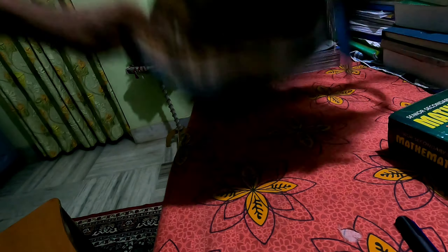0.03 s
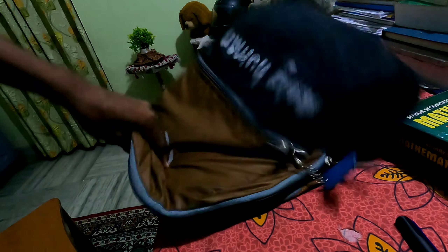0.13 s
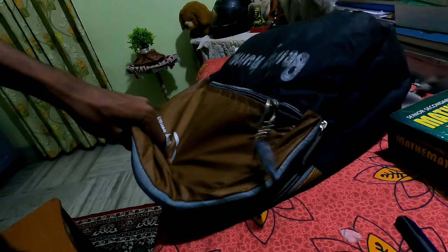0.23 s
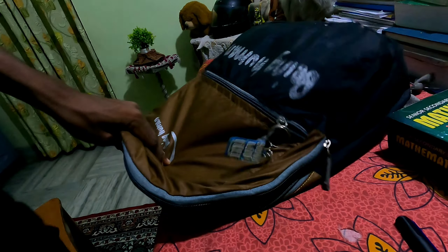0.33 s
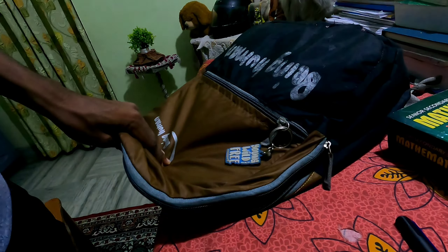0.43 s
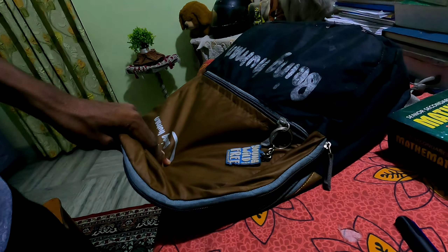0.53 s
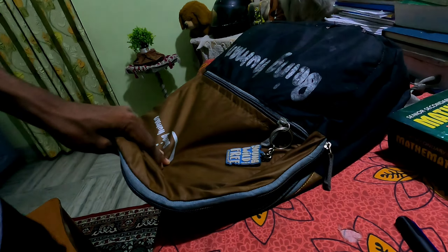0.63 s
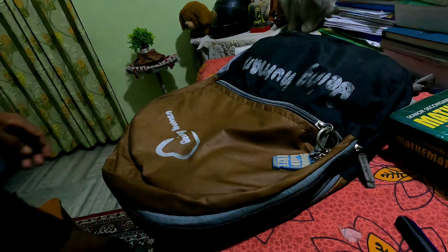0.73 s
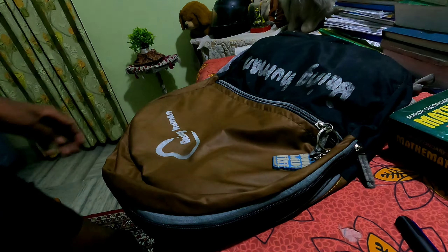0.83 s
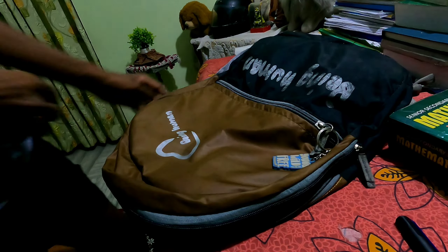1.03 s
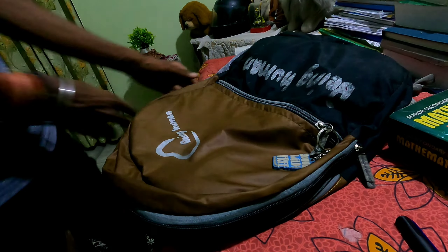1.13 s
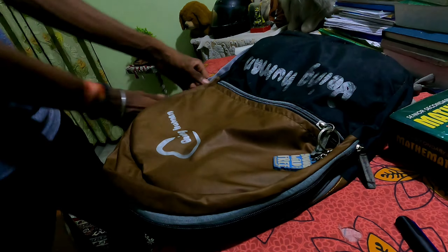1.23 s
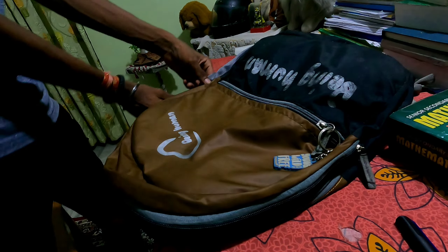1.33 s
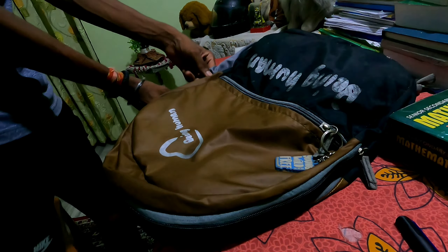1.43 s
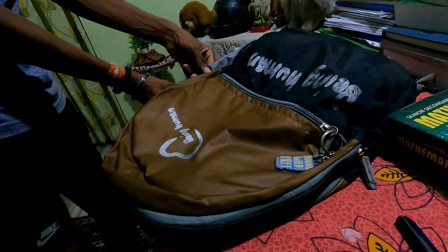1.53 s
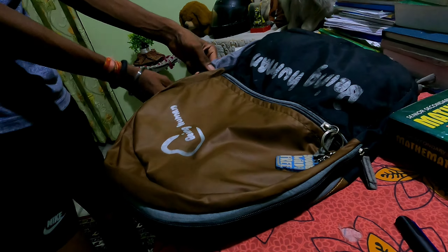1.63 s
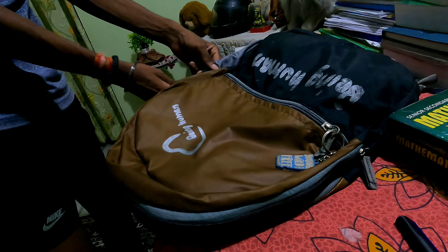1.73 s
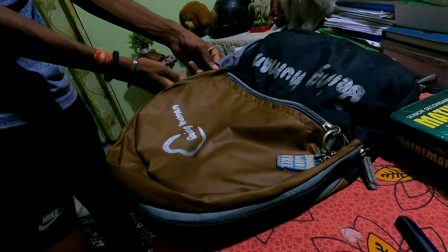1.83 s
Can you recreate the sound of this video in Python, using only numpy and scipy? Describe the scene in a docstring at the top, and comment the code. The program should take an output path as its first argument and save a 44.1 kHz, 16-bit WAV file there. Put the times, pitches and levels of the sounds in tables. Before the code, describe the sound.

A loaded backpack lands on a table with a cluster of padded thuds and cloth slaps, then two soft furniture bumps, a brief dropout, and quiet rummaging with tiny metal ticks, close in a small room.

```python
"""In a small room, a full backpack slaps down on a cloth-covered table; its gear tumbles and the table hums.
Decaying modes make the landing, enveloped grains and noise the fabric, slow sines the swaying table.
Two soft bumps travel through the furniture as dispersed knocks with thumps. The sound drops out for a moment,
then fades back in as hands rummage over the fabric, swishing, with a faint wavering tone.
Small ticks from zip pulls and buckles are bursts of resonant noise."""
import sys
import numpy as np
from scipy import signal
from scipy.fft import rfft, irfft
from scipy.io import wavfile

SR = 44100
rng = np.random.default_rng(int(sys.argv[2]) if len(sys.argv) > 2 else 0)


def to_wav(s):
    """Save 16-bit WAV."""
    ch = np.atleast_2d(s).T  # columns
    pcm = np.round(np.clip(ch, -1, 1) * 32767)  # PCM
    wavfile.write(sys.argv[1], SR, pcm.astype(np.int16))


N = 81585
TIME = np.arange(N) / SR
FREQUENCY = np.maximum(np.arange(N // 2 + 1) * SR / N, 1)   # Hz, kept above zero for the logarithm
ROOM_T60_S, CLOTH_ROOM_DB, LANDING_ROOM_DB = 0.24, -15.5, -9.5


def from_db(db):
    """Level: 20 dB is a factor of ten in amplitude."""
    return 10 ** (np.asarray(db) / 20)


def rms_one(x):
    """Normalisation: scale to unit mean power."""
    return x / np.sqrt(np.mean(x ** 2) + 1e-20)


def noise():
    """White noise: equal mean power at all frequencies."""
    return rng.standard_normal(N)


def level(rows):
    """Envelope: gain over time, interpolated in decibels."""
    return from_db(np.interp(TIME, *np.transpose(rows)))


def colour(x, points):
    """Spectral shaping: gain interpolated over log frequency, 12 dB/octave loss below; rms 1."""
    hz, db = np.transpose(points)
    gain = from_db(np.interp(np.log(FREQUENCY), np.log(hz), db))
    gain = gain * np.minimum(FREQUENCY / hz[0], 1) ** 2
    return rms_one(irfft(rfft(x) * gain, N))


def lowpass(x, hz, order=2):
    """Low-pass filtering with a Butterworth response."""
    sos = signal.butter(order, min(hz, SR / 2 - 1), fs=SR, output="sos")
    return signal.sosfilt(sos, x + 1e-18)


def drift(rate_hz):
    """Random modulation: low-passed noise with spread 1."""
    settled = lowpass(rng.standard_normal(2 * N), rate_hz)[N:]
    return rms_one(settled)


def click(s):
    """Impulse: one unit click, shared between neighbouring samples."""
    return np.maximum(1 - np.abs(TIME - s) * SR, 0)


def ring(x, hz, t60):
    """Damped resonance: a unit click sets a sine of height 1 ringing."""
    radius = from_db(-60 / (t60 * SR))
    angle = 2 * np.pi * hz / SR
    return signal.lfilter([0, np.sin(angle)], [1, -2 * radius * np.cos(angle), radius ** 2], x + 1e-18)


def swell(s, attack, t60):
    """Growth and decay: exponential rise to a peak at s, then exponential fall."""
    rise = (TIME - s) / attack
    fall = (s - TIME) * np.log(1000) / t60
    return np.exp(np.minimum(rise, fall))


def grains(per_s, spread_db):
    """Stick-slip friction: tiny random slips of fibres, of uneven size and either sign."""
    sizes = from_db(spread_db * np.minimum(rng.exponential(1, N), 5))
    return (rng.random(N) < per_s / SR) * sizes * rng.choice([-1, 1], N)


def room(x, wet_db):
    """Reverberation: add a diffuse decaying tail that starts with the first wall echo."""
    tail = lowpass(noise(), 9500) * np.exp(-TIME * np.log(1000) / ROOM_T60_S)
    tail = tail * (TIME > 0.006)
    tail = tail / np.sqrt(np.sum(tail ** 2))
    return x + from_db(wet_db) * signal.fftconvolve(x, tail)[:N]


# spectrum of the room's hush: [f/Hz, relative density level/dB]
HUSH_COLOUR = [(30, -9.5), (100, 2.5), (250, -7.5), (400, -9), (620, -20), (1100, -17), (2000, -24.5),
               (4000, -39.5), (7000, -36.5), (7900, -49.5), (11000, -57), (15000, -73)]


def hush():
    """Background noise: a steady random sound with a falling spectrum."""
    return from_db(-52.5) * colour(noise(), HUSH_COLOUR)


# rubbing of fabric under the hands: [t/s, level/dB]
RUB_LEVEL = [(0, -53), (.14, -52.5), (.205, -57), (.3, -45.5), (.47, -56.5), (.53, -59), (.57, -68.5),
             (.96, -59), (1.08, -56), (1.15, -52.5), (1.19, -52.5), (1.26, -52.5), (1.4, -51),
             (1.45, -52.5), (1.57, -50.5), (1.63, -50.5), (1.68, -54.5), (1.85, -55.5)]
# its spectrum: [f/Hz, relative density level/dB]
RUB_SPECTRUM = [(150, -17), (400, -1), (520, 3), (700, 1), (1080, 2.5), (1550, -2.5), (3000, -7.5),
                (4500, -14.5), (7100, -14), (7800, -24.5), (10000, -29.5), (15000, -58)]
RUB_FLUTTER_DB = 1.5


def rubbing():
    """Friction noise: dense fibre slips, with a fluttering level, sum to a rustle."""
    rustle = colour(grains(per_s=7000, spread_db=1), RUB_SPECTRUM)
    flutter = from_db(RUB_FLUTTER_DB * drift(46))
    return room(level(RUB_LEVEL) * flutter * rustle, CLOTH_ROOM_DB)


# dull shifting of the bag's bulk: [t/s, level/dB]
SHIFT_LEVEL = [(0, -51), (.11, -47.5), (.19, -51), (.3, -24), (.5, -57), (.58, -54), (.8, -60.5),
               (.93, -44), (.99, -57.5), (1.1, -43.5), (1.25, -47.5), (1.4, -44.5), (1.55, -47.5),
               (1.85, -53)]
# its spectrum: [f/Hz, relative density level/dB]
SHIFT_SPECTRUM = [(30, -26), (70, -8.5), (115, 0.5), (180, 3), (240, -1), (315, 3.5), (430, -12),
                  (800, -29), (2000, -59.5)]


def shifting():
    """Random excitation: the moving load gives low-frequency noise."""
    return level(SHIFT_LEVEL) * colour(noise(), SHIFT_SPECTRUM)


# low sway of the table as it is leant on: [peak t/s, level/dB, attack/s, t60/s, mean f/Hz]
TABLE_SWAYS = [(0.081, -40.5, 0.04, 0.17, 52), (.24, -28, 0.013, 0.42, 41), (.45, -30, 0.043, 0.21, 44),
               (0.612, -43.5, 0.034, 0.48, 65), (0.879, -29.5, 0.036, 0.28, 22),
               (0.931, -37, 0.005, .12, 175), (1.245, -43, 0.021, 0.46, 60), (1.39, -42, 0.014, 0.16, 160),
               (1.437, -34, 0.02, 0.06, 89), (1.44, -42.5, 0.047, .1, 47)]
SWAY_SPREAD_HZ = 8.93


def sways():
    """Frequency modulation: pressure on the bag swells into low, unsteady vibrations of the table."""
    out = 0
    for s, db, attack, t60, hz in TABLE_SWAYS:
        pitch = hz + SWAY_SPREAD_HZ * drift(28)
        vibration = np.sqrt(2) * np.sin(2 * np.pi * np.cumsum(pitch) / SR)
        out = out + from_db(db) * swell(s, attack, t60) * vibration
    return out


# sleeves and palms brush over smooth nylon: [peak t/s, level/dB, attack/s, t60/s, centre f/Hz]
STROKES = [(.185, -51, 0.055, 0.37, 2800), (0.459, -60.5, 0.091, 0.49, 3500), (.97, -63, 0.11, 0.8, 5400),
           (1.183, -55.5, 0.015, 0.26, 2350), (1.305, -59, 0.0088, 0.13, 4000),
           (1.395, -54.5, 0.024, .22, 3600), (1.498, -55, .01, 0.21, 4200),
           (1.635, -57, 0.023, 0.098, 2170), (1.75, -62, .015, 0.15, 4920)]
# top end of every stroke's spectrum: [f/Hz, relative level/dB]
STROKE_TOP = [(7200, -1), (7900, -5.5), (10000, -13), (14000, -43)]
STROKE_SKIRT_DB = 9.5   # loss per octave off centre


def swishes():
    """Band-limited friction noise: each light stroke hisses around its own centre."""
    hiss = colour(noise(), [(100, 0.0042), *STROKE_TOP])
    out = 0
    for s, db, attack, t60, hz in STROKES:
        band = [(hz * 2.0 ** octave, -abs(octave) * STROKE_SKIRT_DB) for octave in range(-2, 3)]
        out = out + from_db(db) * swell(s, attack, t60) * colour(hiss, band)
    return out


# the bag and its load land: [t/s, level/dB, contact softness as cut-off f/Hz, thud f/Hz]
LANDING_BLOWS = [(.218, -13, 1200, 338), (0.2238, -11.5, 670, 275), (.232, -19.5, 870, 110),
                 (0.2404, -9, 417, 106.5), (0.2504, -14, 570, 115), (0.2661, -10, 1330, 378),
                 (0.285, -12.5, 1070, 89), (0.3005, -14.5, 730, 172), (0.335, -32, 810, 204),
                 (0.388, -26.5, 300, 65)]
# what the loaded table rings with: [f/Hz, level/dB, t60/s]
MODES = [(55.75, -17.5, 0.66), (80, -26.5, 0.57), (108.5, -12.5, 0.46), (161.6, -25.5, 0.53),
         (205.4, -18, 0.29), (245.3, -14, 0.17), (310.7, -16, 0.084), (385, -27, 0.083),
         (430, -16.5, 0.089), (543, -16.5, 0.12), (640, -12, 0.051), (811, -20, 0.15), (1072, -16.5, 0.13)]
THUD_T60_S, THUD_DB = 0.045, -1.5   # dead thud of the padding


def landing():
    """Modal excitation: padded blows thud and ring the table, each mode a little differently each time."""
    pushes = np.array([from_db(db) * lowpass(click(s), cut_hz) for s, db, cut_hz, _ in LANDING_BLOWS])
    strengths = from_db(rng.normal(0, 1.6, (len(LANDING_BLOWS), len(MODES))))
    ringing = 0
    for k, (hz, db, t60) in enumerate(MODES):
        sign = (-1) ** k   # neighbouring modes start in opposite directions
        ringing = ringing + sign * from_db(db) * ring(strengths[:, k] @ pushes, hz, t60)
    thuds = sum(ring(push, blow[3], THUD_T60_S) for push, blow in zip(pushes, LANDING_BLOWS))
    return room(ringing + from_db(THUD_DB) * thuds, LANDING_ROOM_DB)


# cloth slapping and crumpling: [peak t/s, level/dB, attack/s, t60/s]
CLOTH_SLAPS = [(0.2215, -32, .001, 0.074), (0.2358, -22, 0.0037, 0.035), (0.2393, -25, 0.0033, 0.047),
               (0.263, -29, 0.033, 0.42), (0.334, -38.5, 0.0086, 0.064), (0.375, -37, 0.0074, 0.088),
               (0.514, -53.5, 0.025, 0.068)]
# its spectrum: [f/Hz, relative density level/dB]
SLAP_SPECTRUM = [(150, 14), (500, 6.5), (1000, 7), (2000, -1), (4500, -7), (7000, -15), (10000, -30),
                 (15000, -51)]


def slaps():
    """Granular noise: bursts of dense fibre slips as the fabric slaps and crumples."""
    envelope = sum(from_db(db) * swell(s, attack, t60) for s, db, attack, t60 in CLOTH_SLAPS)
    crumple = colour(grains(per_s=16000, spread_db=2.2), SLAP_SPECTRUM)
    return room(envelope * crumple, CLOTH_ROOM_DB)


# the room's low modes boom on after the landing: [peak t/s, level/dB, attack/s, t60/s]
ROOM_BOOM = (.3, -29.5, 0.07, 0.62)
# their spectrum: [f/Hz, relative density level/dB]
BOOM_SPECTRUM = [(70, -14), (110, 1), (165, -2), (230, -8), (400, -29), (1000, -60)]


def boom():
    """Room resonance: low noise swells and decays after the landing."""
    s, db, attack, t60 = ROOM_BOOM
    return from_db(db) * swell(s, attack, t60) * colour(noise(), BOOM_SPECTRUM)


# zip pulls and buckles tick: [peak t/s, level/dB, resonance f/Hz, bandwidth/Hz, t60/s]
METAL_TICKS = [(.5135, -46, 3600, 1590, 0.067), (1.2895, -41.5, 3000, 1200, 0.011),
               (1.2986, -51, 3020, 696, .06), (1.4872, -33.5, 1710, 1170, 0.01),
               (1.739, -48.5, 2300, 700, 0.015), (1.753, -49, 2840, 250, 0.049)]


def ticks():
    """Resonant filtering: small metal parts touch in a short rattle with one broad resonance."""
    out = 0
    for s, db, hz, width_hz, t60 in METAL_TICKS:
        radius = np.exp(-np.pi * width_hz / SR)
        poles = [1, -2 * radius * np.cos(2 * np.pi * hz / SR), radius ** 2]
        rattle = signal.lfilter([1, 0, -1], poles, noise())
        rattle = rms_one(lowpass(rattle, 6000, order=3))
        out = out + from_db(db) * swell(s, 0.00014, t60) * rattle
    return room(out, CLOTH_ROOM_DB)


# bumps through the furniture:
# [t/s, level/dB, delay at 1 kHz/s, knock f/Hz, knock relative level/dB, thump f/Hz, thump t60/s]
FURNITURE_BUMPS = [(0.7217, -19, .0072, 990, -4, 41.4, 0.19),
                   (0.9136, -17.5, 0.00315, 486, -5, 51.4, 0.092)]
THUMP_LAG_S, THUMP_CUT_HZ = 0.0044, 165
KNOCK_CYCLES, KNOCK_TOP = 3.5, 3.3   # t60 in cycles; low-pass cut-off as a multiple of the knock's pitch


def bumps():
    """Dispersion: bending waves carry treble fastest, so a falling chirp comes first, then a thump."""
    out = 0
    for s, db, delay, knock_hz, knock_db, thump_hz, thump_t60 in FURNITURE_BUMPS:
        knock = ring(click(s), knock_hz, KNOCK_CYCLES / knock_hz)
        knock = lowpass(knock, KNOCK_TOP * knock_hz, order=3)
        knock = knock - lowpass(knock, knock_hz / 2, order=1)   # thin out the lows
        # this phase delays each frequency in proportion to 1 / sqrt(f)
        dispersion = np.exp(-4j * np.pi * delay * np.sqrt(1000 * FREQUENCY))
        knock = irfft(rfft(knock) * dispersion, N)
        push = lowpass(click(s + delay + THUMP_LAG_S), THUMP_CUT_HZ)
        thump = ring(push, thump_hz, thump_t60)
        out = out + from_db(db) * (from_db(knock_db) * knock - thump)
    return out


# a faint wavering tone while the hands move: [t/s, mean f/Hz, mean level/dB]
TONE_PATH = [(1.15, 546.6, -73), (1.195, 558, -51.5), (1.27, 585, -58), (1.33, 573.5, -60.5),
             (1.39, 555, -56), (1.45, 564, -75)]


def tone():
    """Frequency and amplitude modulation: a thin, unsteady note rises and sinks under the rustle."""
    s, hz, db = np.transpose(TONE_PATH)
    pitch = np.interp(TIME, s, hz) + 6 * drift(30)
    gain = from_db(np.interp(TIME, s, db) + 0.75 * drift(20))
    return gain * np.sqrt(2) * np.sin(2 * np.pi * np.cumsum(pitch) / SR)


def scene():
    """Superposition: every source at the table adds to the hush of the room."""
    handling = hush() + rubbing() + shifting() + sways() + swishes()
    impacts = landing() + slaps() + boom() + ticks() + bumps()
    return (handling + impacts + tone())[None]


DROPOUT_S, RETURN_S, DROPOUT_DB = 1.0055, 1.009, -32
LOWS_FADE_S, TREBLE_FADE_S, TREBLE_FROM_HZ = 0.067, 0.11, 3200
CUTOFF_HZ = 15500


def record(dry):
    """Band-wise gain: sound drops out abruptly and fades back, lows sooner; a low-pass cuts the top."""
    split = signal.butter(2, TREBLE_FROM_HZ, fs=SR, output="sos")
    lows = signal.sosfiltfilt(split, dry)
    before = np.clip((DROPOUT_S - TIME) / 0.002 + 0.5, 0, 1)
    out = 0
    for band, fade_s in ((lows, LOWS_FADE_S), (dry - lows, TREBLE_FADE_S)):
        back = np.clip((TIME - RETURN_S) / fade_s, 0, 1) ** 2
        gain = np.maximum(np.maximum(before, back), from_db(DROPOUT_DB))
        out = out + band * gain
    return signal.sosfilt(signal.cheby2(12, 70, CUTOFF_HZ, fs=SR, output="sos"), out)


dry = scene()
out = record(dry)
to_wav(out)
```